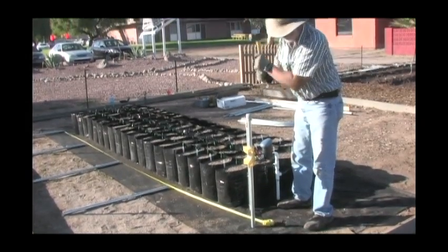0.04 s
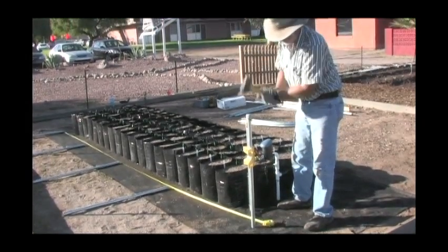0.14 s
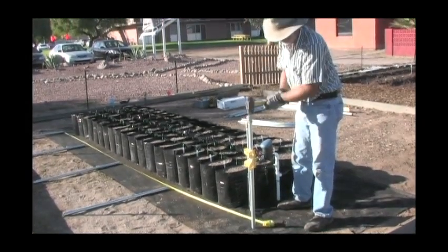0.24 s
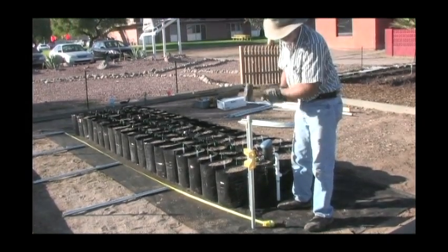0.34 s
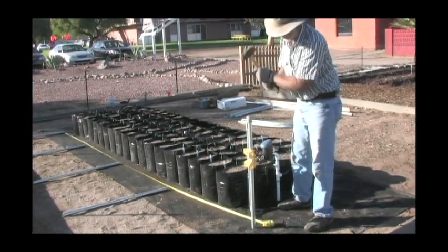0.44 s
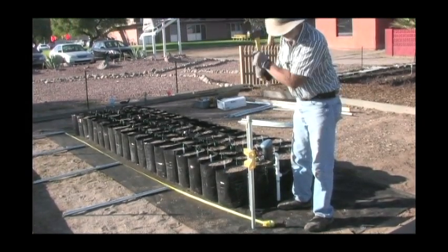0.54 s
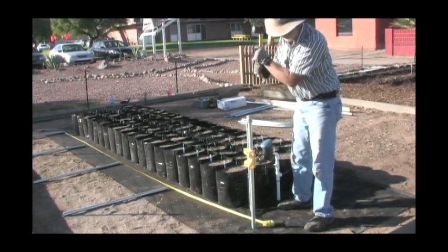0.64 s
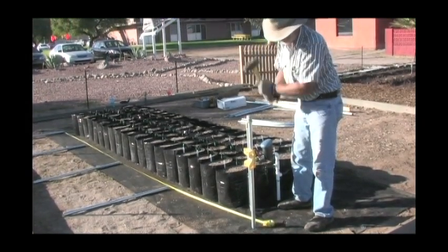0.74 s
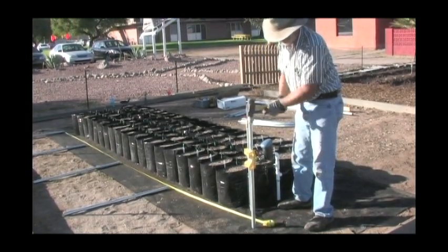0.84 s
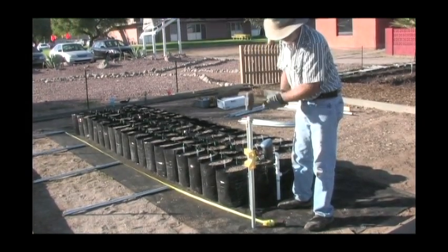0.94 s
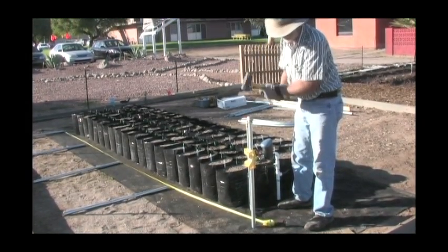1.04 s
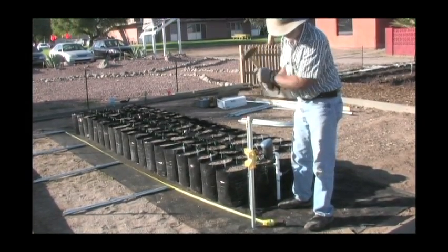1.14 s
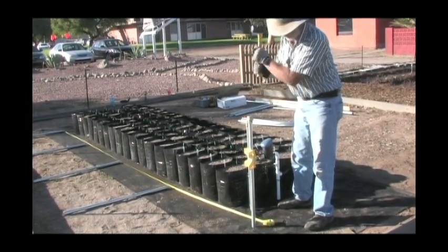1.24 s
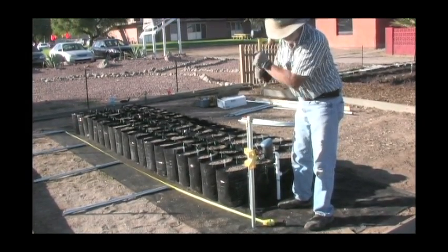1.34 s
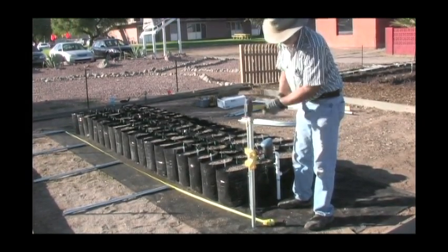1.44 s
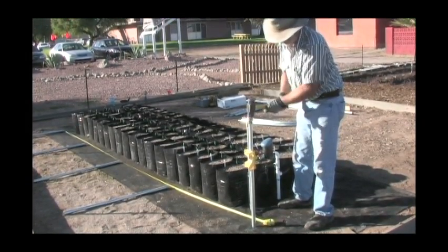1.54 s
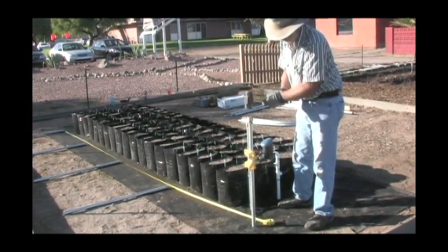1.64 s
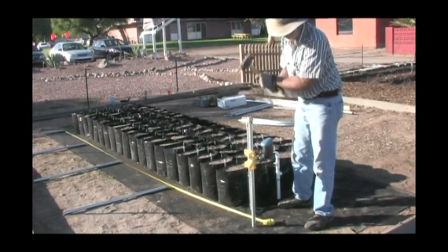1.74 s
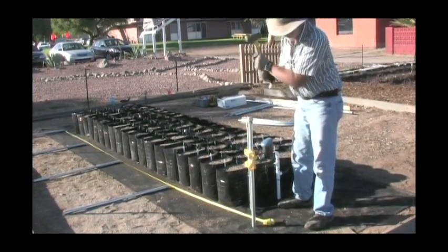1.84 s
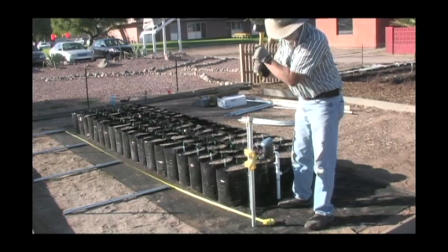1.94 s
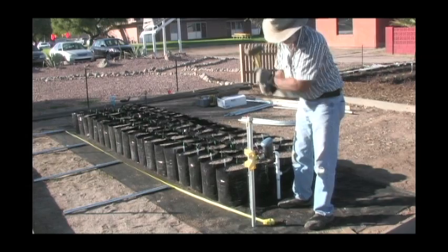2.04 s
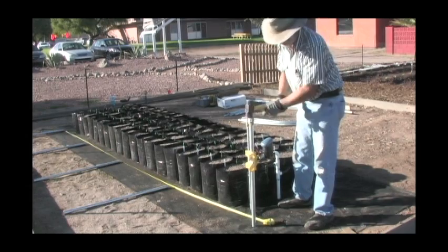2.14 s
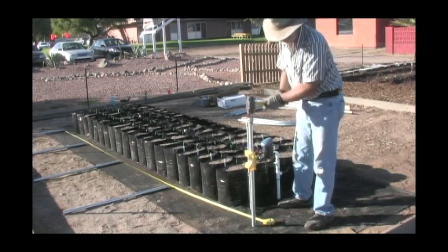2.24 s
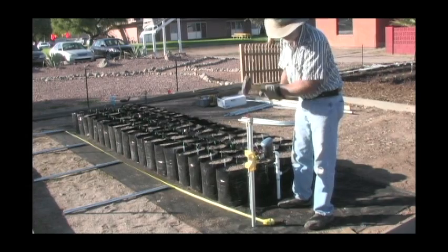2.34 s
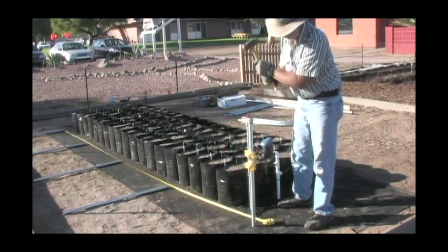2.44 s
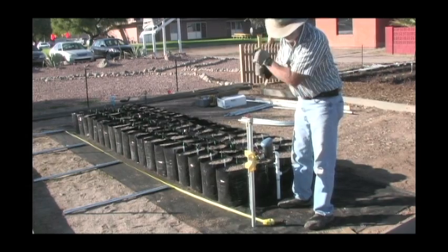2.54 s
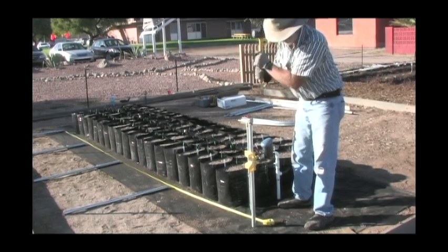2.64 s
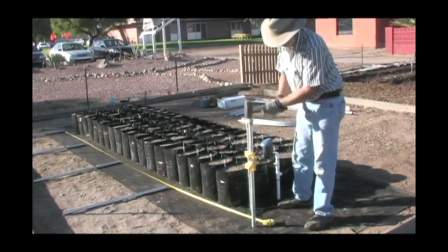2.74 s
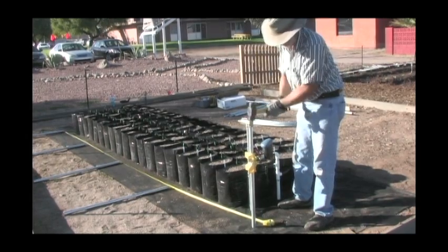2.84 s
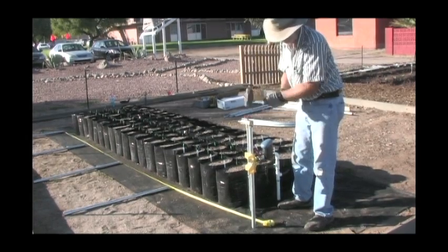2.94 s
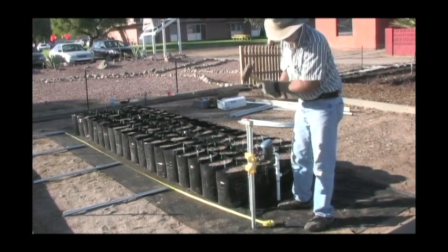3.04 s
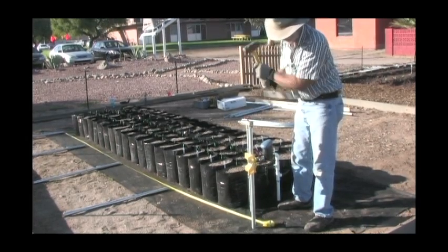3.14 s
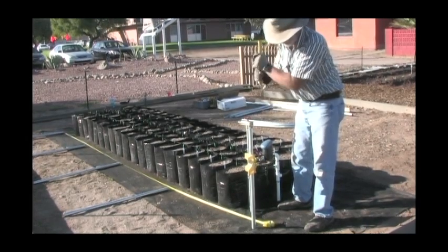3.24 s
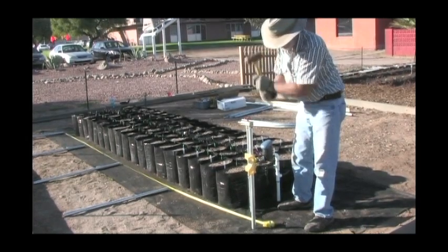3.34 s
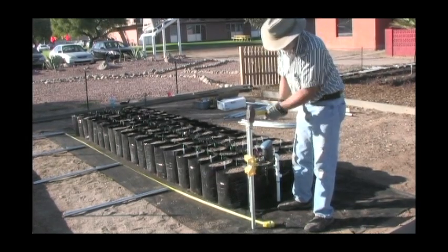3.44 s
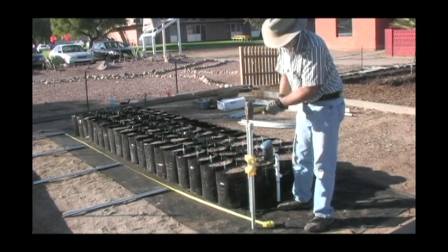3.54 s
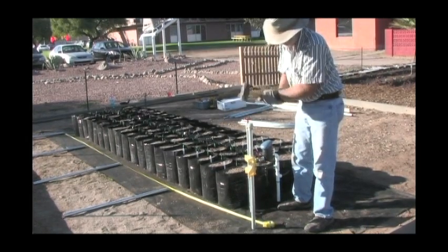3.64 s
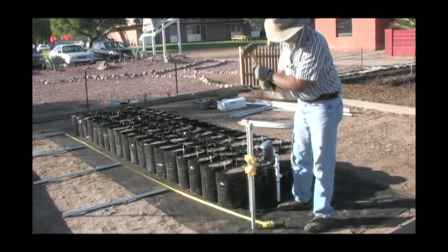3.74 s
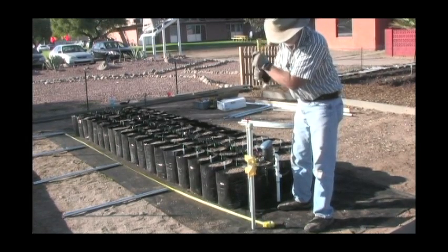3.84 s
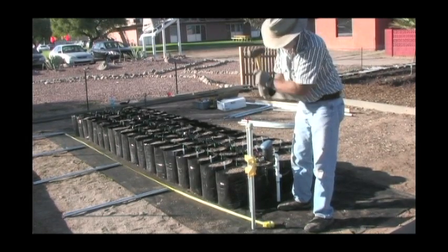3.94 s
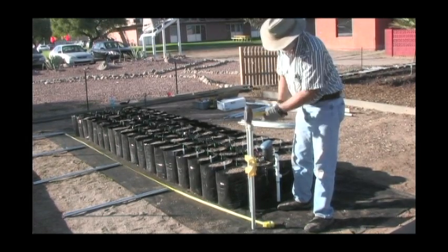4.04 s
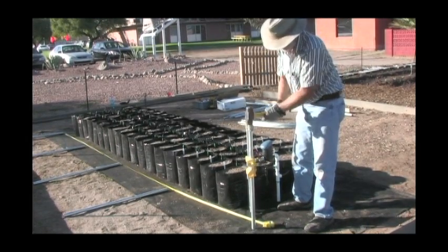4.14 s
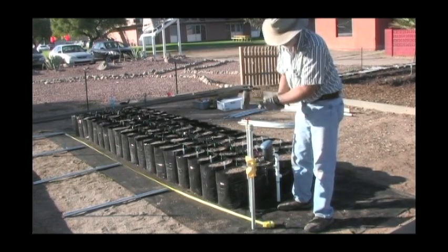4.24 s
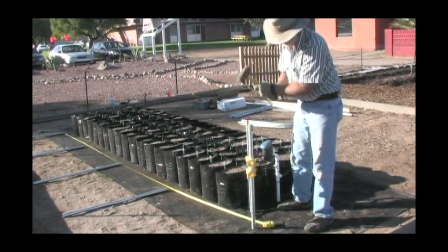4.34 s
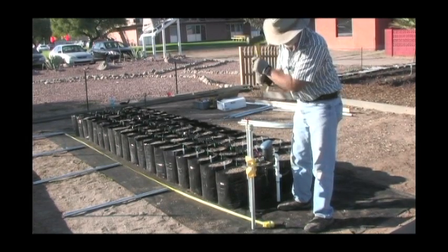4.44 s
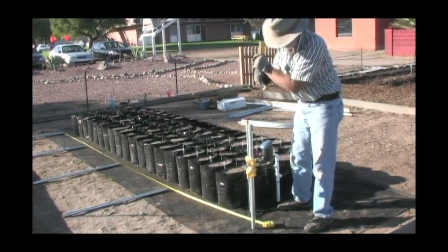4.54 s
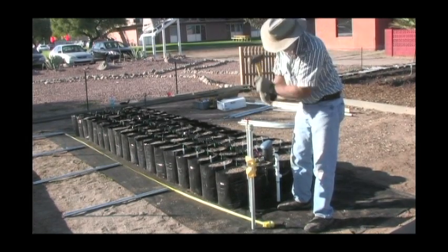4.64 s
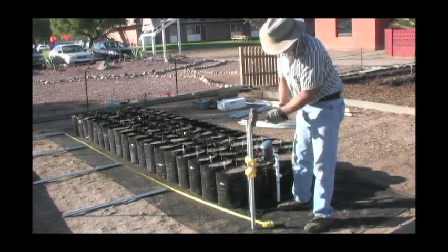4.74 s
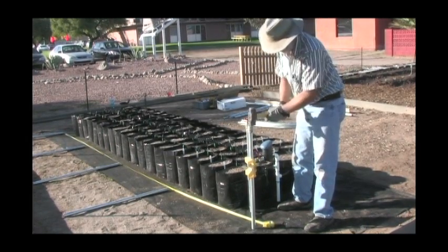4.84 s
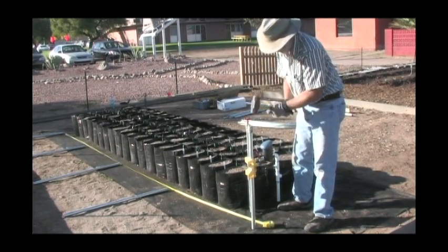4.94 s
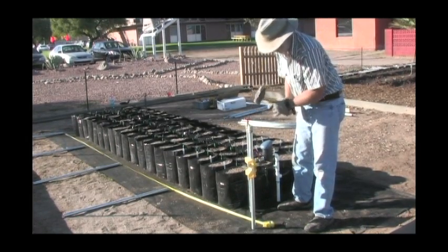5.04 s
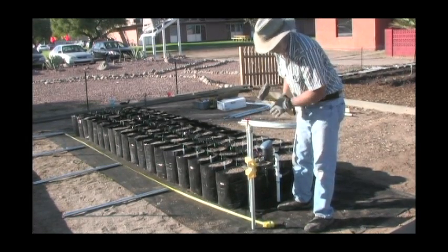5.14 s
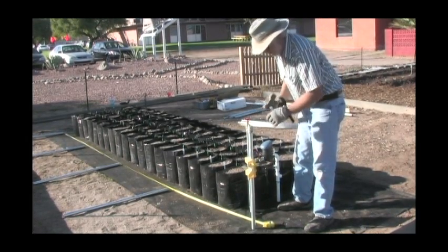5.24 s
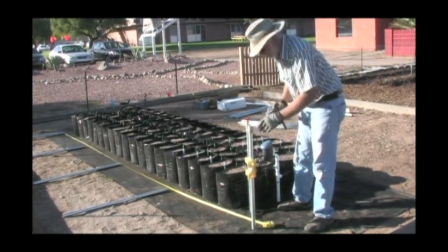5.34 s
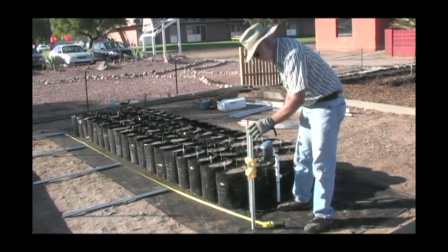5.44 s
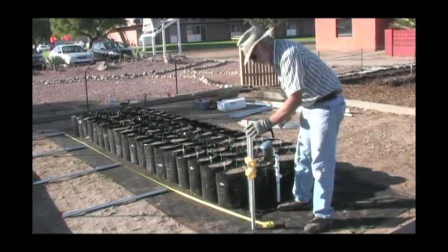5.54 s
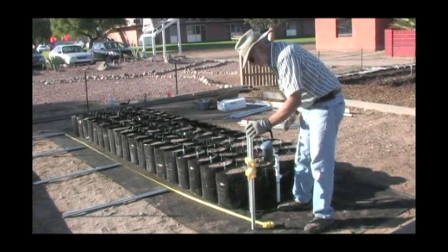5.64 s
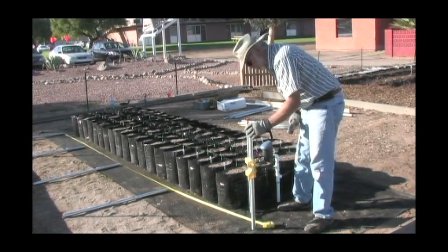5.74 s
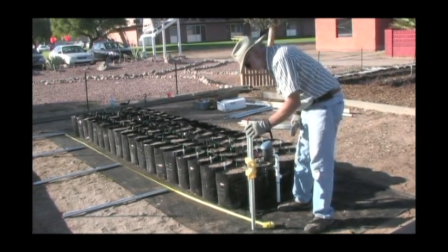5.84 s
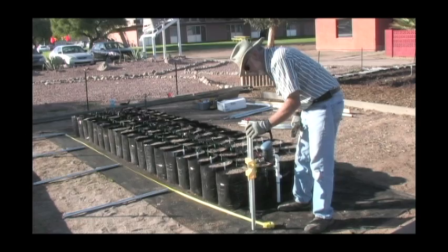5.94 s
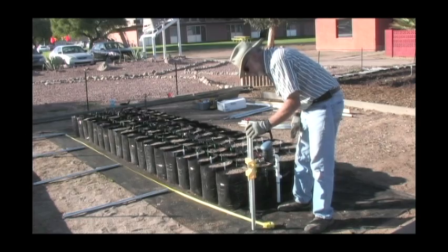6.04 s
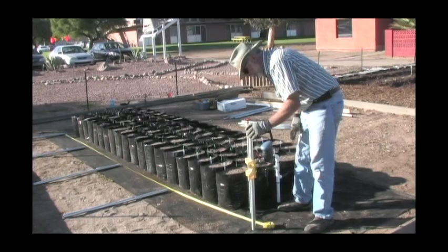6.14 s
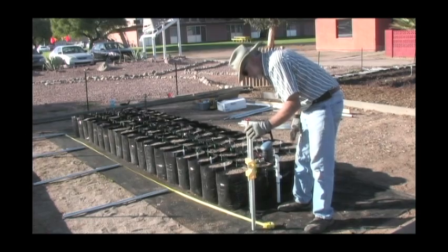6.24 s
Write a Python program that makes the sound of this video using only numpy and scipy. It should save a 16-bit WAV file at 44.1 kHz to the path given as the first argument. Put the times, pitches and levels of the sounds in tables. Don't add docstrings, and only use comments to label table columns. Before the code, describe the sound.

Steady outdoor hammering on a steel post: eight piercing, chattering clanks, some followed by a softer rattle or rebound, all answered by scattered wall reflections to left and right. After the last one fades, light ticks, a clearer tap and dull hollow knocks are heard as the post is handled. Faint traffic and a barely audible thin whine lie beneath. Stereo microphone at a moderate distance, with automatic level control.

```python
import sys
import numpy as np
from scipy import signal
from scipy.fft import rfft, irfft
from scipy.io import wavfile
from scipy.ndimage import uniform_filter1d

SR = 44100
rng = np.random.default_rng(int(sys.argv[2]) if len(sys.argv) > 2 else 0)


def amplitude_ratio(level_db):
    exponent = np.asarray(level_db, float) / 20
    return 10 ** exponent


def to_wav(sig):
    pcm = np.clip(np.atleast_2d(sig), -1, 1) * 32767
    pcm = np.round(pcm).astype(np.int16)
    wavfile.write(sys.argv[1], SR, pcm.T)


N = 277344
LENGTH = SR


def rms_one(x):
    return x / np.sqrt(np.mean(x ** 2) + 1e-20)


def peak_one(x):
    return x / np.abs(x).max()


def at_hz(points, hz):
    points_hz, values = np.transpose(points)
    return np.interp(np.log(hz), np.log(points_hz), values)


def in_time(rows):
    s, *columns = np.transpose(rows)
    return [np.interp(np.arange(N) / SR, s, c) for c in columns]


def drift(rate_hz):
    r = np.exp(-80 * np.pi * rate_hz / SR)
    noise = rng.standard_normal(N // 40 + 2002)
    slow = signal.lfilter([1], [1, -2 * r, r * r], noise)[2000:]
    return np.interp(np.arange(N) / 40, np.arange(len(slow)), rms_one(slow))


def ring(push, hz, t60_s):
    r = amplitude_ratio(-60 / (t60_s * SR))
    w = 2 * np.pi * hz / SR
    return signal.lfilter([0, np.sin(w)], [1, -2 * r * np.cos(w), r * r], push + 1e-18)


def bands(per_octave=2):
    edges_hz = 25 * 2 ** np.arange(0, 9.6, 1 / per_octave)
    return [(np.sqrt(low * high), signal.butter(2, [low, high], "band", fs=SR, output="sos"))
            for low, high in zip(edges_hz, edges_hz[1:])]


COLOUR_BANDS = bands()[3:]
BASS_MID_TREBLE = [signal.butter(3, 2600, fs=SR, output="sos"),
                   signal.butter(3, [2600, 5200], "band", fs=SR, output="sos"),
                   signal.butter(3, [5200, 12500], "band", fs=SR, output="sos")]


def coloured(x, spectrum):
    return sum((-1) ** k * amplitude_ratio(at_hz(spectrum, hz)) * signal.sosfilt(sos, x)
               for k, (hz, sos) in enumerate(COLOUR_BANDS))


def burst(ms, hold_ms=0, size=LENGTH):
    after_ms = np.maximum(np.arange(size) * 1000 / SR - hold_ms, 0)
    tones = rfft(rng.standard_normal(size) * np.exp(-after_ms / max(ms, .1)))
    local_power = uniform_filter1d(np.abs(tones) ** 2, size=40)
    x = irfft(tones / np.sqrt(local_power), size)
    x = x * (np.arange(size) < size // 2)
    return x / np.sqrt(np.sum(x ** 2))


def add(out, x, s):
    i = round(s * SR)
    out[:, i:i + x.shape[-1]] += x[..., :N - i]


def panned(x, pan_db):
    return x * amplitude_ratio(np.array([[pan_db], [-pan_db]]) / 2)


def traffic():
    # (frequency [Hz], density [dB per Hz])
    spectrum = [(15, -68), (25, -46), (56, -10.5), (113, -4.5), (348, -6.5), (682, -7), (1570, -16),
                (1890, -19), (2110, -22), (2910, -21.5), (3150, -34), (4850, -34), (7870, -44.5),
                (15400, -43.5)]
    # (time [s], level [dB], left-right [dB])
    hum = [(0, -46.5, 2), (1, -46, 2), (2, -46.5, 0.5), (3, -46, 2), (4, -46.5, 2.5), (5, -45.5, 2),
           (5.6, -46.5, 0.5), (6, -46.5, 3.5), (6.29, -46, 1)]
    # (frequency [Hz], left-right likeness [-1..1])
    likeness = [(60, -0.51), (180, -0.21), (550, 0.078), (1650, -0.1), (4970, -0.093), (15000, -0.036)]
    level_db, pan_db = in_time(hum)
    out, together, white = 0, drift(7.0), rng.standard_normal((2, 2, N))
    for k, (hz, sos) in enumerate(bands()):
        mid, side = signal.sosfilt(sos, white[k % 2])
        alike = np.clip(at_hz(likeness, hz), -1, 1)
        gain = amplitude_ratio(at_hz(spectrum, hz) + .7 * together + 1.3 * drift(11))
        out = out + gain * (np.sqrt(1 + alike) * mid + np.sqrt(1 - alike) * side * [[1], [-1]])
    out = signal.sosfilt(signal.cheby2(8, 40, 15900, fs=SR, output="sos"), out)
    return amplitude_ratio(level_db) * rms_one(out) * amplitude_ratio(pan_db * [[.5], [-.5]])


def whine():
    # (start [s], length [s], level [dB])
    spells = [(.72, .75, -66), (1.95, .2, -70), (5.1, .17, -64), (5.46, .26, -62), (5.95, .21, -64)]
    hz, fade_s = 2945, .03
    t = np.arange(N) / SR
    on = 0
    for s, length_s, db in spells:
        on = on + amplitude_ratio(db) * np.clip(np.minimum(t - s, s + length_s - t) / fade_s, 0, 1)
    return on * amplitude_ratio(0.88 * drift(9)) * np.sin(2 * np.pi * hz * t)


def thuds():
    # (time [s], peak [dB])
    knocks = [(5.768, -36), (5.778, -36), (6.062, -38), (6.111, -37), (6.126, -39)]
    hz, t60_s, pan_db = 800, .025, 6
    out = np.zeros((2, N))
    for s, db in knocks:
        knock = peak_one(ring(burst(1.0, size=4096), hz, t60_s))
        add(out, panned(amplitude_ratio(db) * knock, pan_db), s)
    return out


def clank(contact_ms, hold_ms, low_db, high_db):
    # (frequency [Hz], width [Hz], level [dB])
    short_modes = [(950, 440, -10), (1128, 84, -2), (1700, 83, -1.2), (2429, 220, -0.5), (3100, 130, 6.5),
                   (3890, 320, 3.5), (4500, 170, -16), (5640, 680, -4), (6956, 356, -2), (9510, 1000, -11),
                   (13900, 300, -31), (14900, 400, -21.5), (344.4, 170, -22)]
    # (frequency [Hz], density [dB per Hz])
    crack = [(59, -41.5), (100, -28), (1410, 6.5), (1640, 2.5), (4480, -1), (6180, 14), (11200, -43.5),
             (14800, -36), (16500, -32.5)]
    push = burst(contact_ms, hold_ms, size=4096)
    modes = 0
    for k, (hz, width_hz, level_db) in enumerate(short_modes):
        tilt_db = np.interp(np.log(hz), np.log([1500, 3500, 7000]), [low_db, 0, high_db])
        t60_s = np.log(1000) / np.pi / width_hz
        modes = modes + (-1) ** k * amplitude_ratio(level_db + tilt_db) * width_hz * ring(push, hz, t60_s)
    return peak_one(rms_one(modes) + amplitude_ratio(2) * rms_one(coloured(push, crack)))


def ringing(ring_db, damping, shift=1, flutter_db=2.5):
    # (frequency [Hz], level [dB], t60 [s])
    free_modes = [(4698, -30, .14), (4724, -26, .19), (4765, -32, .09), (4860, -29, .045), (3030, -39, .05),
                  (3710, -37, .045), (5900, -38, .035), (13250, -50, .1), (13420, -50, .11)]
    click = np.arange(LENGTH // 2) == 0
    starts = amplitude_ratio(rng.normal(0, 2, len(free_modes)))
    detune = shift + .0018 * rng.standard_normal(len(free_modes))
    onset = np.minimum(np.arange(len(click)) / (.03 * SR), 1)
    flutter = amplitude_ratio(flutter_db * drift(35)[:len(click)] * onset)
    modes = 0
    for start, grip, (hz, level_db, t60_s) in zip(starts, detune, free_modes):
        modes = modes + start * amplitude_ratio(level_db + ring_db) * ring(click, hz * grip, t60_s / damping)
    return flutter * modes


def taps():
    # (time [s], peak [dB], left-right [dB], ring [dB], length [ms])
    touches = [(4.6795, -43.5, -2, -18, 3.1), (5.3412, -46, 1, -28, 2.5), (5.3816, -53, -17, -18.5, 3.3),
               (5.565, -46.5, 1, -21, 2), (5.631, -57, 1.5, -12, 2.4), (5.7165, -37.5, 2, 0.5, 2.3),
               (5.7657, -35.5, -4, -22, 2.5), (5.7758, -31.5, 3, -9, 2.2), (5.849, -50, -23, -17, 3.7),
               (5.93, -25.5, 1.5, -5, 4.2), (6.1687, -58.5, -4, 4, 1.8)]
    out, click = np.zeros((2, N)), np.arange(4096) == 0
    for s, db, pan_db, ring_db, length_ms in touches:
        add(out, panned(amplitude_ratio(db) * clank(length_ms, 0, 6.1, -0.82), pan_db), s)
        add(out, panned(amplitude_ratio(db + 5) * ringing(ring_db, 0.8, flutter_db=1), pan_db), s)
        add(out, panned(amplitude_ratio(db + ring_db + 2.0) * ring(click, 4860, 0.049), pan_db), s)
    return signal.sosfilt(signal.butter(2, 9500, fs=SR, output="sos"), out)


def yard():
    # (frequency [Hz], t60 [s])
    decay = [(500, 0.83), (1500, 0.57), (3000, 1), (6000, 0.9), (10000, 0.65), (15000, 0.14)]
    # (frequency [Hz], density [dB per Hz])
    spectrum = [(500, -15.5), (1500, -8), (3000, -10), (4500, -8), (6000, -4), (8000, -13.5), (11000, -20),
                (15000, -22.5)]
    # (time after blow [s], level [dB])
    scatter = [(0, -14.5), (.012, 18.5), (.03, 6.5), (.065, -5.5), (.1, -2.5), (.22, -2), (.4, 1),
               (.47, -1), (1, -8.5)]
    t, white, out = np.arange(LENGTH) / SR, rng.standard_normal((2, 2, LENGTH)), 0
    together = drift(33)[:LENGTH]
    for k, (hz, sos) in enumerate(bands(4)[14:]):
        lumps_db = 1.5 * together + 3.0 * drift(30)[:LENGTH]
        gain = amplitude_ratio(at_hz(spectrum, hz) + lumps_db - 60 * t / at_hz(decay, hz))
        out = out + (-1) ** (k // 2) * signal.sosfilt(sos, white[k % 2]) * gain
    out = out * amplitude_ratio(np.interp(t, *np.transpose(scatter)))
    return out + 0.081 * out[::-1]


def echo(rung, delay_s, bass_db, treble_db, smear_ms):
    x = np.array([clank(smear_ms, 1.6, 0, 0), clank(smear_ms, 1.3, 0, 0)])
    x = x + 0.72 * x[::-1]
    x = x * (1 - np.exp(-np.arange(x.shape[1]) / (0.00078 * SR)))
    x = sum(amplitude_ratio(db) * signal.sosfilt(sos, x)
            for db, sos in zip([bass_db, 0, treble_db], BASS_MID_TREBLE))
    air = signal.butter(2, min(4500 / np.sqrt(delay_s), .45 * SR), fs=SR, output="sos")
    out = amplitude_ratio(8) * np.repeat(signal.sosfilt(air, rung)[None], 2, axis=0)
    add(out, amplitude_ratio(-22) * rms_one(signal.sosfilt(air, x)), 0)
    return out


def direct_blow(out, s, db, low_db, high_db, ring_db):
    left_lead_samples = .3
    mid, side = clank(2.9, 2.2, low_db, high_db), clank(2.3, 2.5, low_db + 7, high_db + 11.5)
    difference = amplitude_ratio(-24.5) * side + left_lead_samples / 2 * np.gradient(mid)
    add(out, amplitude_ratio(db + 12.5) * (mid + difference * [[1], [-1]]), s)
    add(out, amplitude_ratio(db - 23) * side[None, :256], s - .002)
    add(out, amplitude_ratio(db + 1.0) * ringing(ring_db, 0.8)[None], s)


def hammering():
    # (time [s], peak [dB], low clank [dB], high clank [dB], ring [dB])
    blows = [(0.183, -3.5, 6, 7, 2.5), (0.837, 1.5, 5.5, -1.5, 7), (1.494, 0, 7, -14, 6),
             (2.152, -4.5, 7.5, 4.5, 10), (2.791, -5, 13, 9.5, 6.5), (3.441, -2.5, 1, 3, 7),
             (4.081, -3, 18, 14.5, 9.5), (4.734, -2, 4, 3.5, 3.2)]
    # (time after blow [s], peak [dB], left-right [dB], bass [dB], treble [dB])
    walls = [(.077, -28, 18, 1, 15), (.094, -33, 15, 2, -3), (.128, -48, 6, -3, -4),
             (.1538, -22.5, -8, -14, -9), (.171, -27.5, -11, -3, 5), (0.233, -21, -5, -12, 3),
             (0.274, -37.5, -15, -10, 0), (.31, -52, -1, -7, -36), (.3445, -37.5, -3, -12, 4),
             (.39, -44, 10.5, 7, -20)]
    # (time [s], peak [dB], bass [dB], treble [dB])
    bounces = [(0.2433, -12, 3.5, 3), (0.3068, -13, 0.5, 4.5), (1.5402, -13.5, 2, 0), (2.1961, -15, -10, 3),
               (2.8369, -7.5, 2, 9.5), (2.88, -17, -3, 3), (3.487, -11, 3, 6), (3.5278, -26.5, 3, 3),
               (4.1253, -6.5, -1, 4), (4.5625, -44.5, -16, 8.5), (5.2096, -38.5, -4, 0)]
    wall_smear_ms, wall_chance_db, tail_db, bounce_ms = 6.9, -1.04, 0.5, 7.1
    out, response, starts, rung = np.zeros((2, N)), yard(), np.array(blows)[:, 0], []
    for s, db, low_db, high_db, ring_db in blows:
        rebound = ringing(ring_db, 1.2, 1.001)
        rung.append(rebound)
        direct_blow(out, s, db, low_db, high_db, ring_db)
        add(out, amplitude_ratio(db - 22) * echo(rebound, .017, -3, 0, 4), s + .017)
        tail = amplitude_ratio(tail_db - 29) * signal.fftconvolve(rebound[None], response, axes=1)[:, :LENGTH]
        tail = tail + amplitude_ratio(tail_db - 16) * response[::-1]
        add(out, tail, s)
        for delay_s, wall_db, pan_db, bass_db, treble_db in walls:
            back = echo(rebound, delay_s, bass_db, treble_db, wall_smear_ms)
            gain = amplitude_ratio(wall_db + wall_chance_db * rng.standard_normal())
            add(out, panned(gain * back, pan_db), s + delay_s)
    add(out, amplitude_ratio(0.1) * tail[:, round(.47 * SR):], 0)
    for s, db, bass_db, treble_db in bounces:
        last_rung = rung[np.searchsorted(starts, s) - 1]
        add(out, amplitude_ratio(db) * echo(last_rung, .05, bass_db, treble_db, bounce_ms), s)
    return out


def scene():
    return traffic() + whine() + thuds() + taps() + hammering()


def duck(dry):
    threshold_db, share, attack_s, release_s = -29.5, 0.72, 0.011, .13
    t = np.arange(N) / SR
    level_db = 10 * np.log10(uniform_filter1d(np.mean(dry ** 2, axis=0), size=88) + 1e-12)
    over_db = np.maximum(level_db - threshold_db, 1e-3)
    held_db = np.exp(np.maximum.accumulate(np.log(over_db) + t / release_s) - t / release_s)
    r = np.exp(-1 / (attack_s * SR))
    return dry * amplitude_ratio(-share * signal.lfilter([1 - r], [1, -r], held_db))


def low_pass(x):
    return signal.sosfilt(signal.butter(12, 16860, fs=SR, output="sos"), x)


def record(dry):
    x = 0.67 * np.tanh(duck(dry) / 0.63)
    x = signal.sosfilt(signal.butter(3, 100, "high", fs=SR, output="sos"), x)
    x = signal.sosfilt(signal.cheby2(10, 60, 17000, fs=SR, output="sos"), x)
    rumble_band = signal.butter(2, [50, 110], "band", fs=SR, output="sos")
    rumble = signal.sosfilt(rumble_band, rng.standard_normal((2, N)))
    x = x + amplitude_ratio(-65.0) * panned(rms_one(rumble + 0.15 * rumble[::-1]), 2.5)
    return low_pass(x)


dry = scene()
out = record(dry)
to_wav(out)
```